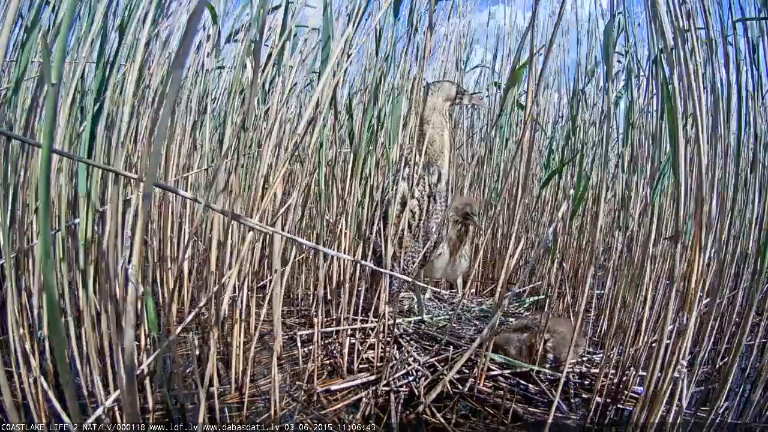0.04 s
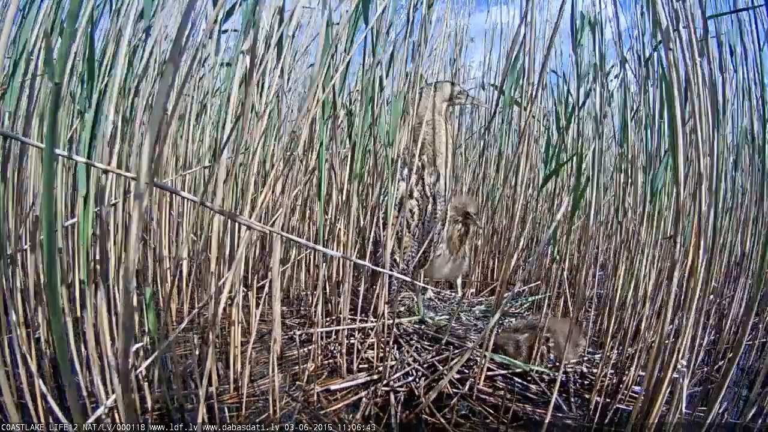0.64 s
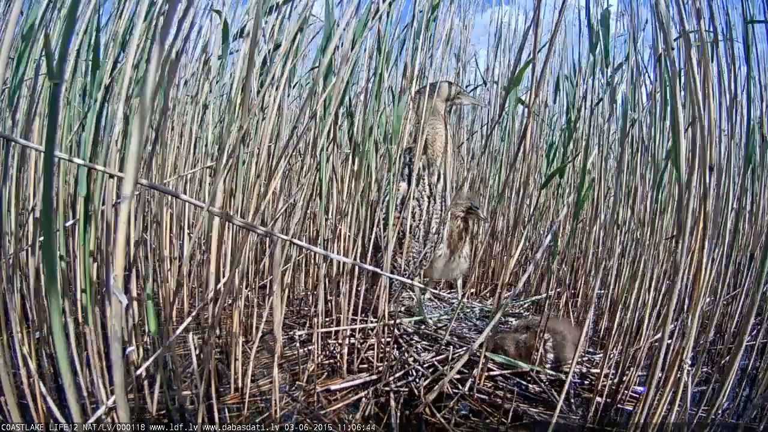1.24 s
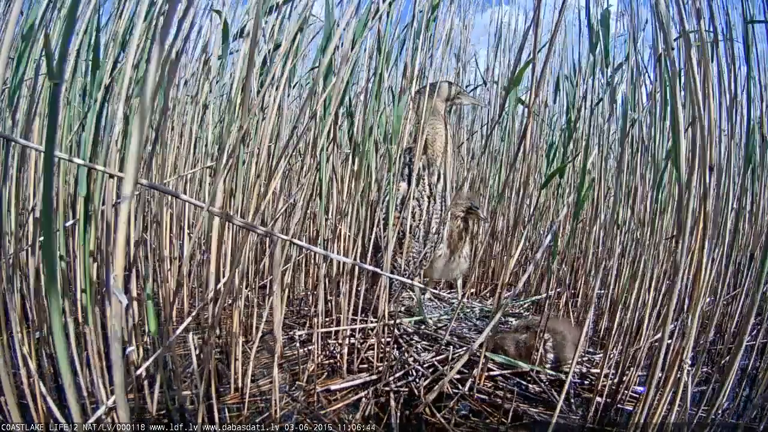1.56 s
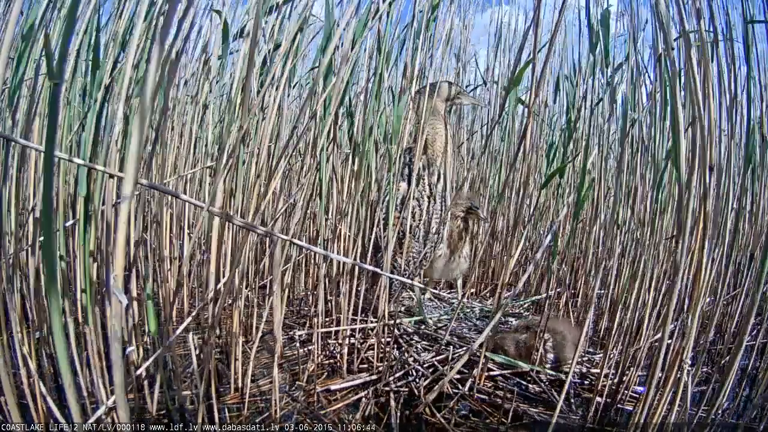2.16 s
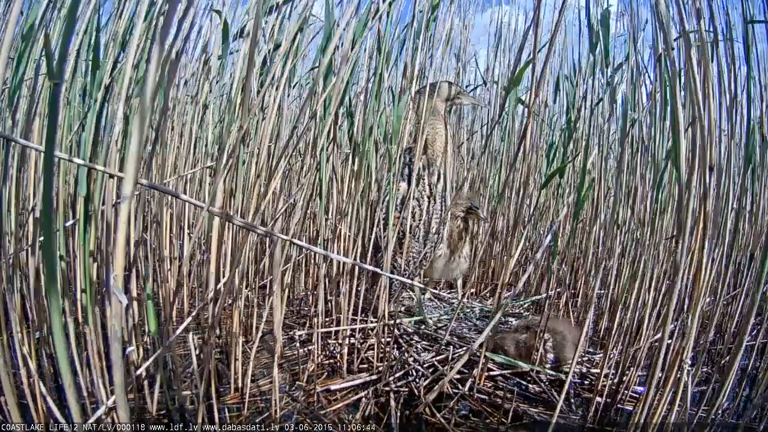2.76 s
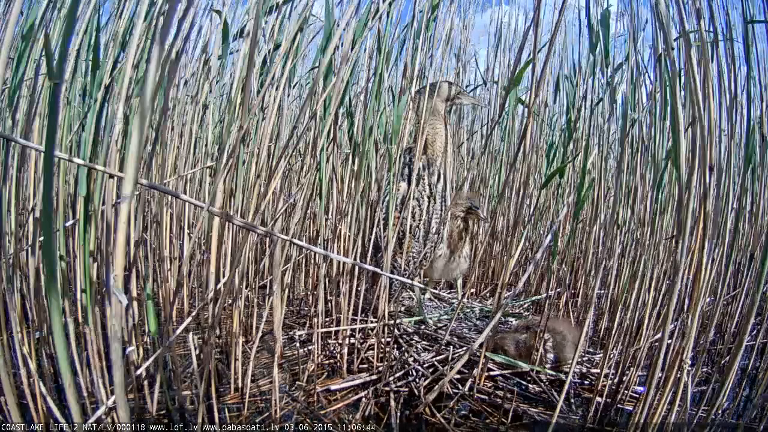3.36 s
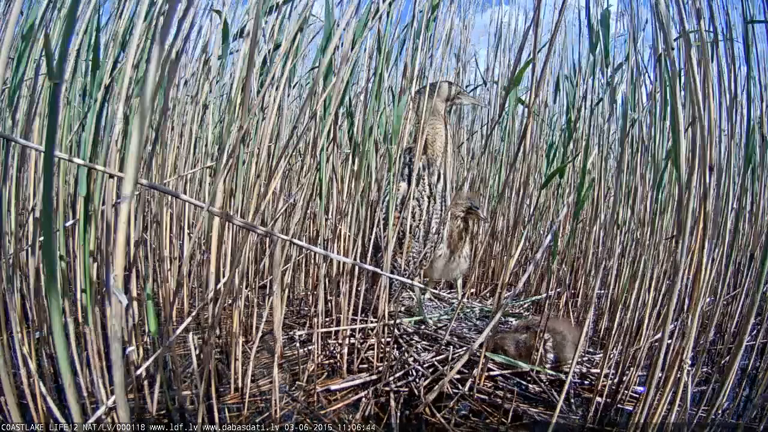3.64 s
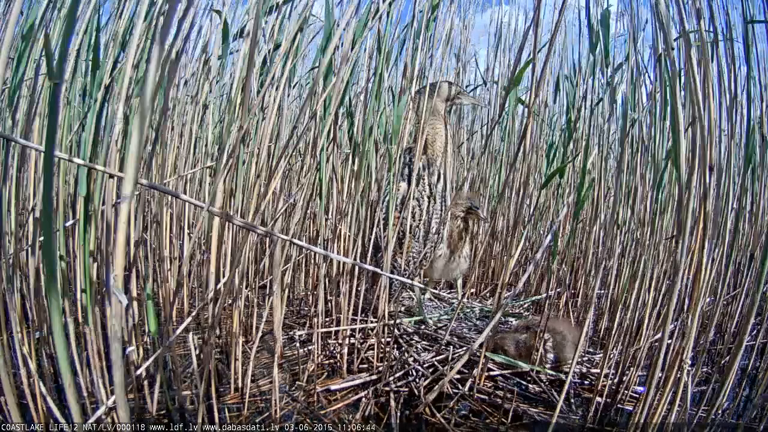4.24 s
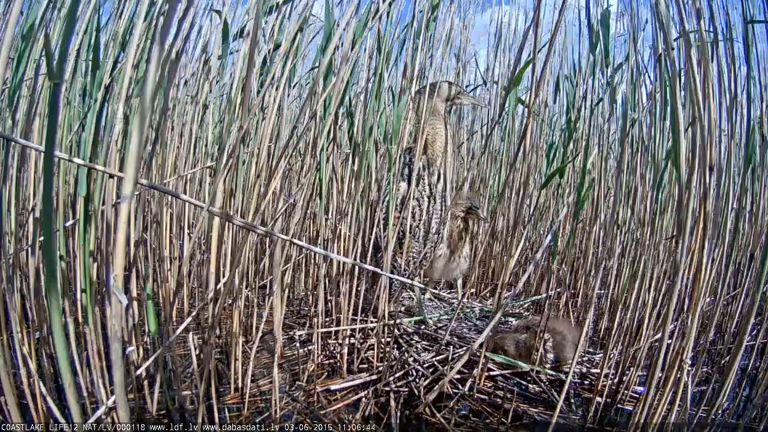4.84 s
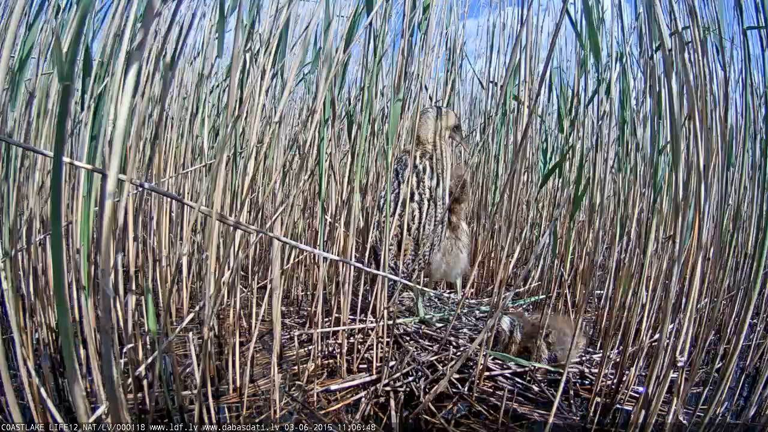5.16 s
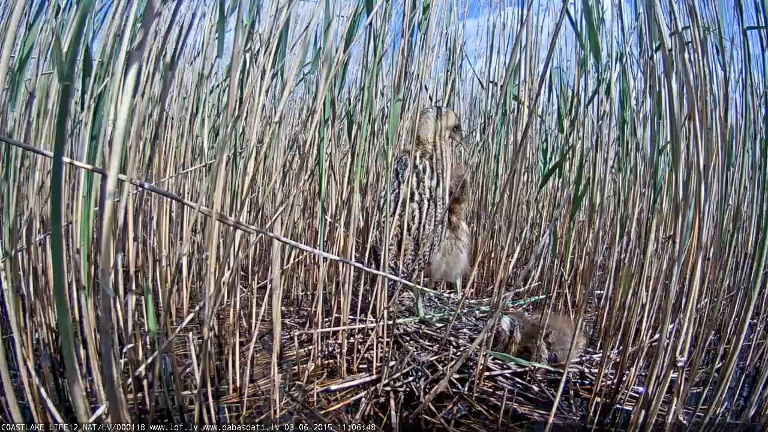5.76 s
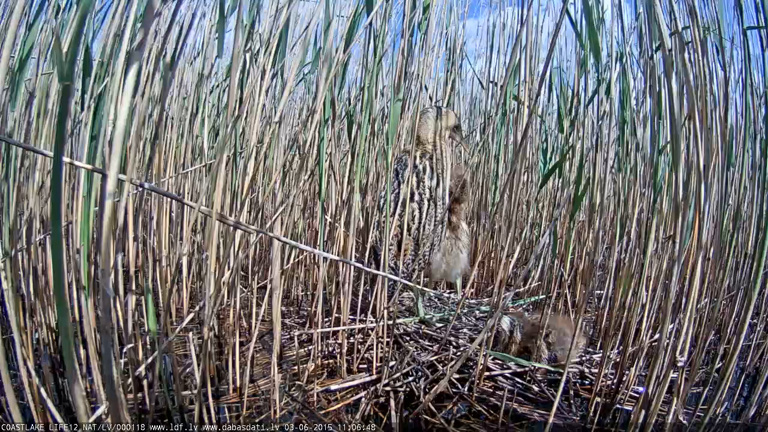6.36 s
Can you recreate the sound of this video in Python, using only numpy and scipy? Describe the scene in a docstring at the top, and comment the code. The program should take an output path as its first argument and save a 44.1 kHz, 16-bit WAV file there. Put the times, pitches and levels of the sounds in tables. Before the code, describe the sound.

Wind hisses through reeds as one gust buffets the microphone, with close stems knocking and scraping and a faint bird chipping far off.

```python
"""Wind in a reed bed: countless leaves hiss and tick as they touch, and close ones scuff.
One gust buffets a small microphone among the stems and shakes its mount. Stems knock, scrape
and creak against the housing, which rings briefly. Far off, over a low rush of air,
a marsh bird repeats a faint rising chip."""
import sys
import numpy as np
from scipy import signal
from scipy.fft import rfft, irfft
from scipy.io import wavfile
from scipy.ndimage import uniform_filter1d

SR = 44100
rng = np.random.default_rng(int(sys.argv[2]) if len(sys.argv) > 2 else 0)


def log_audio(samples):
    """Write samples as a 16-bit WAV file to the path given in sys.argv[1]."""
    # one column per channel
    frames = np.atleast_2d(samples).T
    # limit to full scale, then quantise
    limited = np.clip(frames, -1, 1)
    pcm = np.round(limited * 32767).astype(np.int16)
    wavfile.write(sys.argv[1], SR, pcm)


N = 281799
TIME = np.arange(N) / SR

# Leaf hiss spectrum. Each row: frequency in Hz, relative density in dB.
LEAF_HISS = [(700, -20), (1200, -17), (1600, -12), (2000, -6.5), (2400, -3.5), (2850, 2), (3250, -1.5),
             (3600, -1.5), (4200, -10), (4900, -23.5), (6000, -40.5), (8000, -51.5)]
# Dry treble of the leaves. Each row: frequency in Hz, relative density in dB.
LEAF_TREBLE = [(3500, -2.5), (5200, 6), (6500, 0.5), (8000, -1.5), (9000, 0), (9650, 1), (10600, -2.5),
               (12000, -4)]


def undb(db):
    """Decibels to gain."""
    return 10 ** (np.asarray(db) / 20)


def unit(x):
    """Scale to rms 1."""
    return x / np.sqrt(np.mean(x ** 2))


def colour(x, spectrum):
    """Filter x by a curve of (Hz, dB) points; rms 1."""
    hz, db = np.transpose(spectrum)
    bin_hz = np.maximum(np.arange(N // 2 + 1) * SR / N, 1)
    gain = undb(np.interp(np.log(bin_hz), np.log(hz), db))
    return unit(irfft(rfft(x) * gain, N))


def walk(rate_hz):
    """Random steps at rate_hz, smoothed twice; rms 1."""
    step = max(int(SR / rate_hz), 1)
    stairs = rng.standard_normal(N)[np.arange(N) // step]
    return unit(uniform_filter1d(uniform_filter1d(stairs, step), step))


def grains(per_s, spread_db):
    """Tiny contacts at random times, most weak, a few strong; rms 1."""
    size = undb(spread_db * np.minimum(rng.exponential(size=N), np.log(100)))
    hits = rng.random(N) < per_s / SR
    return unit(hits * size * np.sign(rng.standard_normal(N)))


def plateau(full_s, hold_s, rise_s, fall_s):
    """Envelope: exponential rise to 1 at full_s, hold, exponential fall."""
    t = TIME - full_s
    return np.exp(np.minimum(t, 0) / rise_s - np.maximum(t - hold_s, 0) / fall_s)


def add(out, start_s, sound, peak_db):
    """Mix in a sound, scaled to peak_db."""
    i = max(int(start_s * SR), 0)
    part = sound[:max(N - i, 0)]
    out[i:i + len(part)] += undb(peak_db) * part / np.abs(sound).max()


def far_air(level_db=-46):
    """Low, even rush of wind over the wider marsh."""
    # Each row: frequency in Hz, relative density in dB.
    spectrum = [(20, -15), (60, 1), (180, 0.5), (300, -4), (500, -4.5), (900, -11.5), (1500, -9.5),
                (3000, -46)]
    return colour(rng.standard_normal(N), spectrum) * undb(level_db + .5 * walk(rate_hz=3.86))


def bird(trim_db=-2, scatter_db=1.8, scatter_hz=14, sag_hz_per_s=22, rise_s=.0064, fall_s=.005):
    """Runs of thin, hoarse chips; each flicks upward, its octave coming out as it climbs."""
    # Each row: start in seconds, chip count, interval in seconds, peak in dB before trim, pitch in Hz.
    runs = [(.071, 3, .13, -28, 1580), (1.359, 6, .1275, -28, 1535), (2.137, 12, .1341, -28.5, 1510),
            (5.72, 3, .135, -31.5, 1530)]
    out = np.zeros(N)
    lead_s = .02
    t = TIME[:SR // 20] - lead_s
    glide = np.exp(10 * t + 200 * np.maximum(t, 0) ** 2)
    swell = np.exp(-(t / np.where(t < 0, rise_s, fall_s)) ** 2)
    tail = undb(-6) * np.exp(-((t - .014) / .0058) ** 2)
    octave = undb(1) * np.exp(-((t - .008) / .004) ** 2)
    hoarseness = 1 + .031 * walk(rate_hz=500)
    for start_s, count, interval_s, db, first_hz in runs:
        for k, (louder, higher) in enumerate(rng.standard_normal((count, 2))):
            at_s = start_s + k * interval_s
            hz = first_hz - sag_hz_per_s * (at_s - start_s) + scatter_hz * higher
            phase = 2 * np.pi * np.cumsum(hz * glide * hoarseness[int(at_s * SR):][:len(t)]) / SR
            chip = (swell + tail) * np.sin(phase) + octave * np.sin(2 * phase)
            add(out, at_s - lead_s, chip, db + scatter_db * louder)
    return out * undb(trim_db)


def mount(level_db=-38, mode_hz=43, wander_hz=4):
    """The mount shakes on its lowest mode during the gust."""
    phase = 2 * np.pi * np.cumsum(mode_hz + wander_hz * walk(rate_hz=14)) / SR
    shake = unit(np.sin(phase) * undb(2.7 * walk(rate_hz=12)))
    return shake * undb(level_db) * plateau(full_s=1.34, hold_s=1.03, rise_s=.51, fall_s=.16)


def housing(force):
    """Response of the housing's damped modes to a force."""
    # Each row: frequency in Hz, T60 in seconds, relative level in dB.
    modes = [(320, .02, -34), (529, 0.062, -1), (620, 0.011, 1.5), (796, 0.014, -5.5), (927, 0.021, 0),
             (1030, 0.011, -16), (1100, 0.023, -7.5)]
    t = TIME[:SR // 10]
    ring = sum(undb(db) * np.exp(-np.log(1000) * t / t60_s) * np.sin(2 * np.pi * hz * t)
               for hz, t60_s, db in modes)
    return signal.fftconvolve(force, ring)


def scraping(light_touch_db=-55, patchy_db=4):
    """Stems lean on the housing and slide in fits."""
    # Each row: time of full level in seconds, hold in seconds, level in dB.
    slides = [(1.823, 0.33, -37), (2.337, 0.21, -33), (2.65, 0.2, -45.5), (3.464, 0.76, -49.5),
              (5.87, .33, -48.5)]
    # Each row: frequency in Hz, relative density in dB.
    spectrum = [(200, -6), (400, -6), (530, -2.5), (660, -4.5), (800, 3.5), (930, 2.5), (1060, -12),
                (1300, -14.5), (2200, -49), (5000, -70)]
    leaning = sum(undb(db) * plateau(full_s, hold_s, rise_s=.071, fall_s=.06)
                  for full_s, hold_s, db in slides)
    friction = colour(grains(per_s=1200, spread_db=.5), spectrum)
    fits = unit(undb(patchy_db * walk(rate_hz=40)))
    return friction * (undb(light_touch_db) + leaning) * fits


def creaks(jitter=.026, scatter_db=2.5, sharpness=1.04):
    """A stem sticks and slips; the uneven pulses ring the housing."""
    # Each row: start in seconds, peak in dB, slip rate in Hz, length in seconds.
    catches = [(.762, -33, 790, .01), (1.827, -20.5, 970, 0.01), (1.841, -16.5, 830, 0.0049),
               (2.158, -20.5, 860, 0.03), (2.226, -26, 860, 0.0053), (2.284, -24.5, 940, 0.0084),
               (2.451, -27, 1020, 0.01), (2.668, -23, 780, 0.017), (2.708, -27, 870, 0.022),
               (4.218, -19, 786, 0.012), (4.583, -25.5, 830, 0.017), (4.647, -35, 870, .015),
               (5.921, -30.5, 940, 0.017), (6.072, -28, 605, 0.015)]
    out = np.zeros(N)
    pace = 1 + jitter * walk(rate_hz=560)
    grip = undb(scatter_db * walk(rate_hz=1100))
    for start_s, peak_db, slip_hz, length_s in catches:
        span = slice(int(start_s * SR), int((start_s + length_s) * SR))
        phase = 2 * np.pi * np.cumsum(slip_hz * pace[span]) / SR
        slips = grip[span] * np.exp(sharpness * np.cos(phase))
        force = np.diff(slips * signal.windows.tukey(len(slips)))
        add(out, start_s, housing(force), peak_db)
    return out


def knocks():
    """Stems strike the housing: a short push, then its ring."""
    # Each row: start in seconds, peak in dB, contact time in ms, ring relative to push in dB.
    strikes = [(1.7877, -5.5, 0.87, 15), (1.8627, -20, 0.93, -7), (2.0142, -21, 1.3, 0),
               (2.4326, -4.5, 1.03, -2), (3.274, -27, 1.5, 10), (3.3817, -12.5, 1.14, -7),
               (3.7153, -23.5, 0.64, -4)]
    out = np.zeros(N)
    t_ms = 1000 * TIME[:SR // 100]
    for start_s, peak_db, contact_ms, ring_db in strikes:
        push = np.sin(np.pi * np.minimum(t_ms / contact_ms, 1)) ** 2
        ring = housing(np.diff(push))
        blow = undb(ring_db) * ring / np.abs(ring).max()
        blow[:len(push)] += push
        add(out, start_s, blow, peak_db)
    return out


def puffs():
    """Single eddies burst on the microphone: a pressure peak with suction on either side."""
    # Each row: centre in seconds, peak in dB, half width in seconds.
    bursts = [(2.2254, -4, 0.0036), (2.238, -10, 0.0068)]
    out = np.zeros(N)
    for centre_s, peak_db, width_s in bursts:
        u = (TIME - centre_s) / width_s
        add(out, 0, (1 - u ** 2) * np.exp(-u ** 2 / 2), peak_db)
    return out


def gust(peak_s=2.48, rise_db_per_s=21, fall_db_per_s=36):
    """Gain of the gust at the microphone; 1 at its height."""
    t = TIME - peak_s
    return undb(np.minimum(rise_db_per_s * t, -fall_db_per_s * t))


def buffeting(rumble_db=-23, flutter_db=-36, calm_rumble_db=-50, calm_flutter_db=-49):
    """Turbulence on the microphone: draught, gust and eddies add in power."""
    # Each row: centre in seconds, half width in seconds, rumble in dB, flutter in dB.
    eddies = [(1.84, .04, -27.5, -40.5), (2.225, 0.02, -16.5, -27.5), (2.385, 0.038, -20.5, -20.5),
              (3.35, .08, -37.5, -47), (4.0, 0.15, -43, -49), (6.2, 0.17, -42.5, -45)]
    # Each row of both: frequency in Hz, relative density in dB.
    rumble_spectrum = [(8, -0.5), (25, 3.5), (45, -3.5), (70, -3), (110, -8.5), (170, -20.5), (400, -59),
                       (2000, -80)]
    flutter_spectrum = [(60, -28), (120, 0), (190, 0), (320, -4), (450, -14.5), (650, -23), (1400, -54),
                        (4000, -75)]
    rumble_power = undb(calm_rumble_db) ** 2 + (undb(rumble_db) * gust()) ** 2
    flutter_power = undb(calm_flutter_db) ** 2 + (undb(flutter_db) * gust()) ** 2
    for centre_s, width_s, eddy_rumble_db, eddy_flutter_db in eddies:
        swirl = np.exp(-((TIME - centre_s) / width_s) ** 2 / 2)
        rumble_power += (undb(eddy_rumble_db) * swirl) ** 2
        flutter_power += (undb(eddy_flutter_db) * swirl) ** 2
    rumble = colour(rng.standard_normal(N), rumble_spectrum) * np.sqrt(rumble_power)
    flutter = colour(rng.standard_normal(N), flutter_spectrum) * np.sqrt(flutter_power)
    return rumble + flutter * undb(1.85 * walk(rate_hz=25))


def scuffs(treble_db=-17):
    """A close leaf scuffs its neighbour: a brief flare of dry hiss."""
    # Each row: start in seconds, peak in dB, decay time in seconds.
    touches = [(0.52, -23, .003), (1.74, -19.5, 0.014), (1.872, -18, 0.012), (2.107, -14, 0.0015),
               (2.245, -17.5, 0.015), (2.9786, -27, .003), (3.025, -21.5, 0.013), (3.805, -22.5, 0.023),
               (3.958, -22, 0.0088), (4.216, -23, 0.01), (5.92, -20.5, 0.012)]
    out = np.zeros(N)
    hiss = colour(rng.standard_normal(N), LEAF_HISS)
    hiss += undb(treble_db) * colour(rng.standard_normal(N), LEAF_TREBLE)
    t = TIME[:SR // 10]
    for start_s, peak_db, decay_s in touches:
        flare = np.sqrt(t) * np.exp(-t / decay_s)
        add(out, start_s, hiss[int(start_s * SR):][:len(t)] * flare, peak_db)
    return out


def leaves(tick_db=-5, calm_hiss_db=-33.5, calm_treble_db=-54, hiss_db_per_db=.55, calm_db=-55):
    """Far leaves hiss, near ones tick and flap; more wind adds contacts and lifts the treble most."""
    # Each row: time in seconds, wind strength in dB (calm at calm_db).
    wind = [(0.0, -54), (0.03, -53.5), (1.07, -53), (1.23, -54.5), (2.04, -45), (2.17, -46.5),
            (2.24, -43.5), (2.38, -47), (3.52, -52), (3.98, -51.5), (4.55, -54), (5.27, -53), (6.35, -47.5),
            (6.39, -48)]
    wind_db = np.interp(TIME, *np.transpose(wind)) - calm_db
    growth_db = hiss_db_per_db * wind_db
    contacts_per_s = 2100 * undb(growth_db)
    rustle = rng.standard_normal(N) + undb(tick_db) * grains(contacts_per_s, spread_db=3.5)
    flapping = unit(undb(.6 * walk(rate_hz=50)))
    hiss = colour(rustle, LEAF_HISS) * flapping * undb(calm_hiss_db + growth_db)
    treble = colour(rustle, LEAF_TREBLE) * undb(calm_treble_db + wind_db + .5 * walk(rate_hz=54))
    flicker_db = .62 * walk(rate_hz=22) + .24 * walk(rate_hz=11)
    return (hiss + treble) * undb(flicker_db)


def scene():
    """Mono sum at the microphone."""
    near_wind = leaves() + scuffs() + buffeting() + puffs() + mount()
    stems = knocks() + scraping() + creaks()
    return (near_wind + stems + bird() + far_air())[None]


def record(dry, cutoff_hz=12050):
    """The recorder's steep low-pass."""
    return signal.sosfilt(signal.ellip(12, .1, 80, cutoff_hz, fs=SR, output="sos"), dry)


dry = scene()
out = record(dry)
log_audio(out)
```